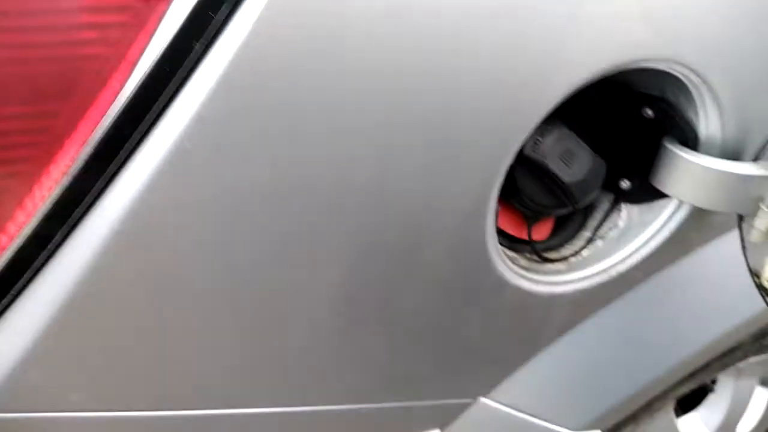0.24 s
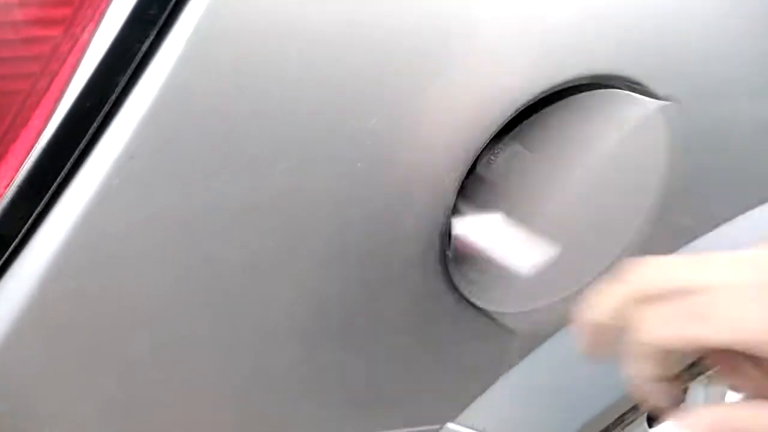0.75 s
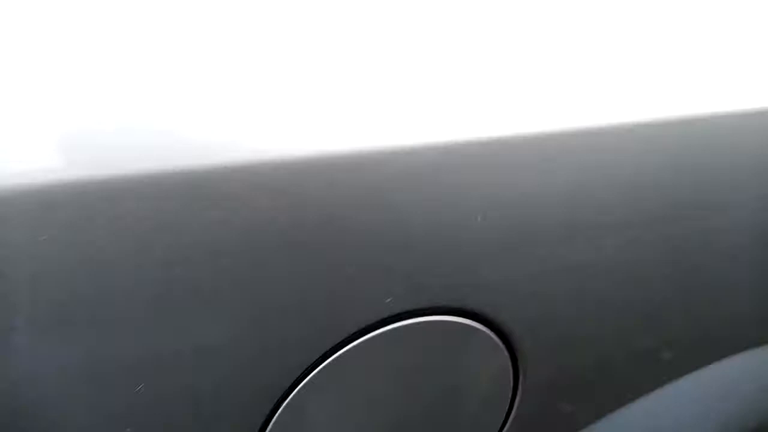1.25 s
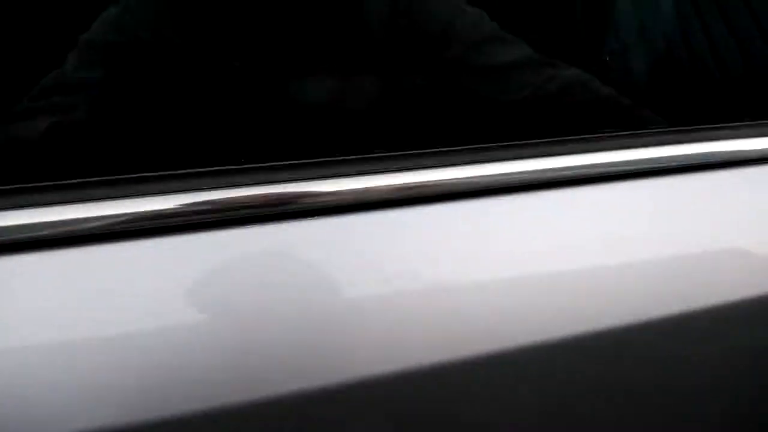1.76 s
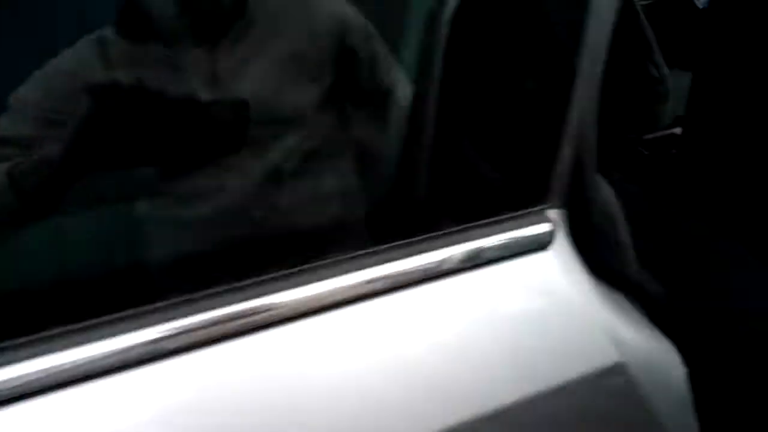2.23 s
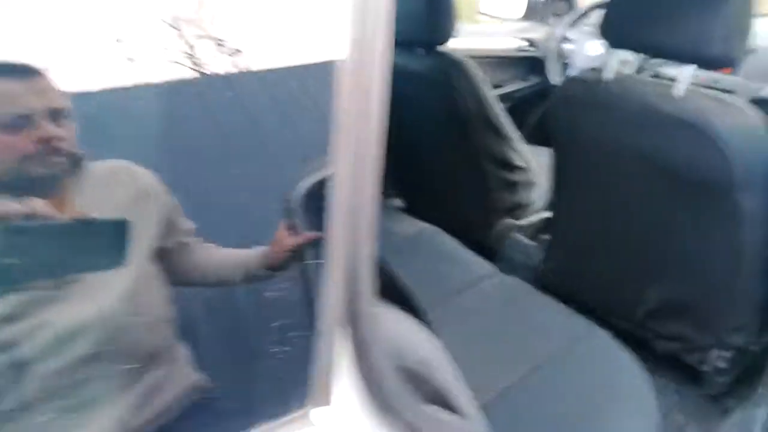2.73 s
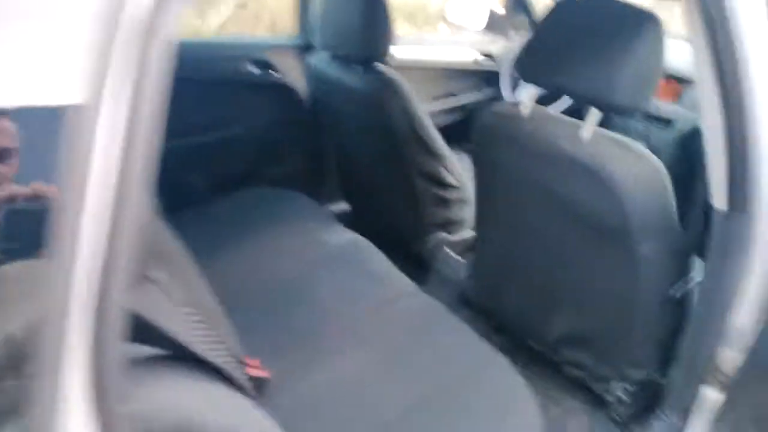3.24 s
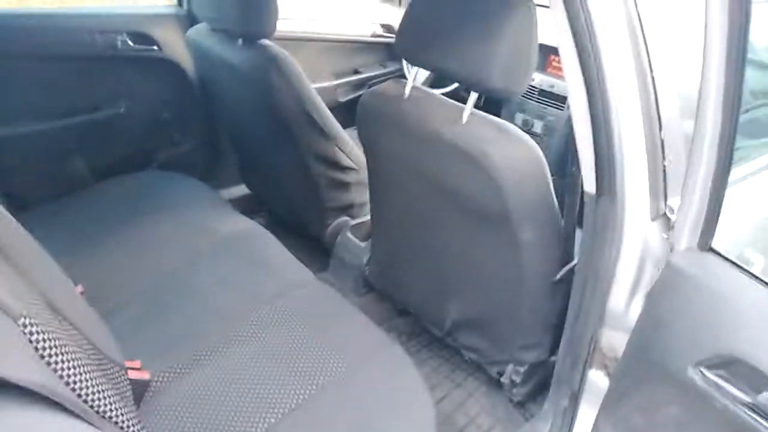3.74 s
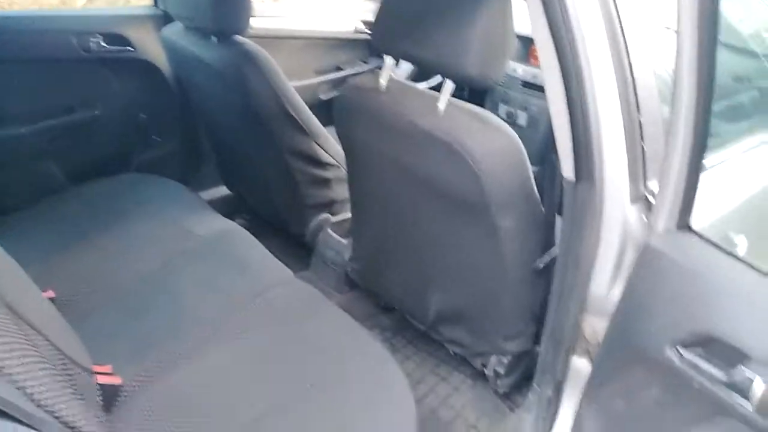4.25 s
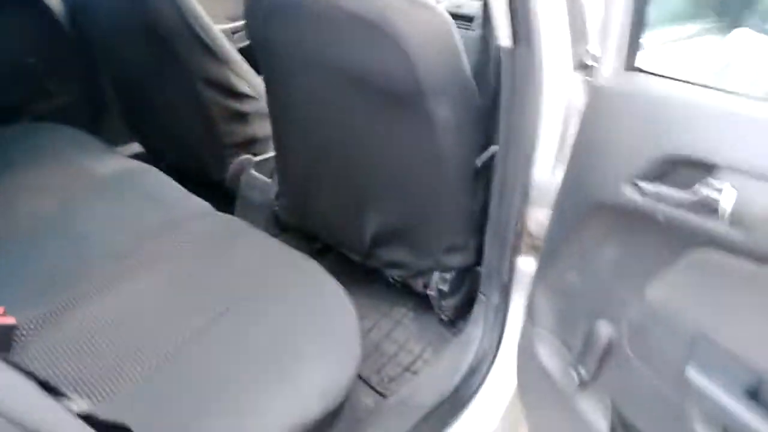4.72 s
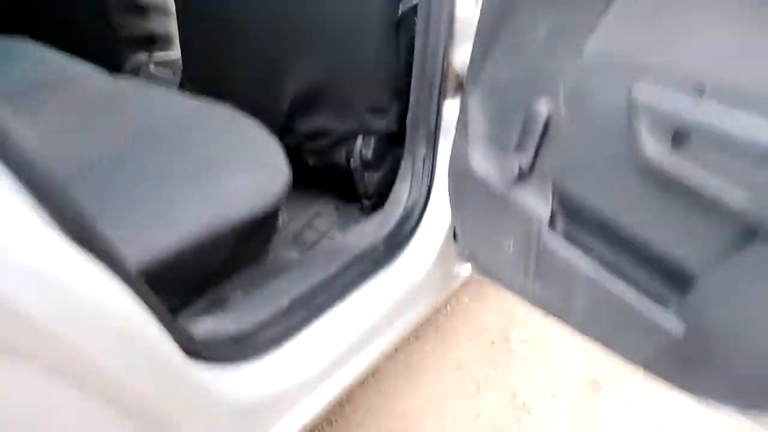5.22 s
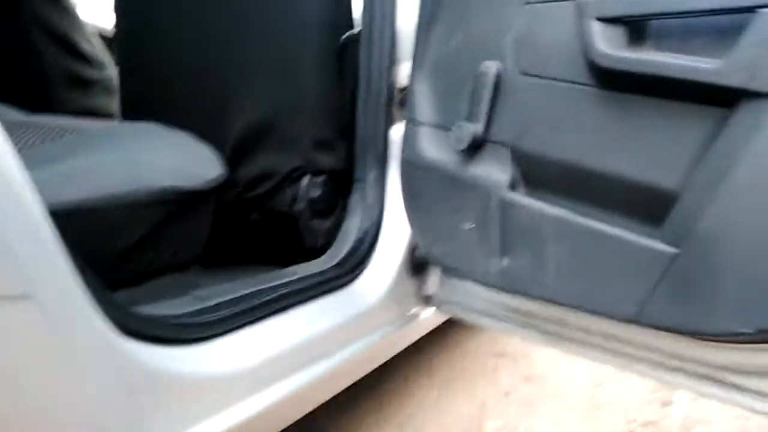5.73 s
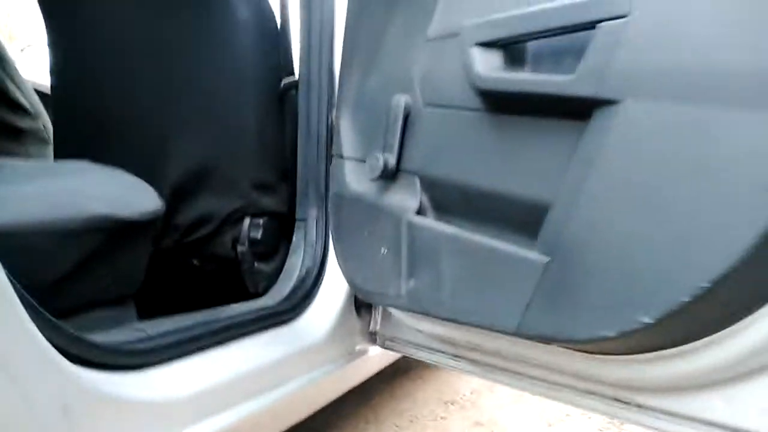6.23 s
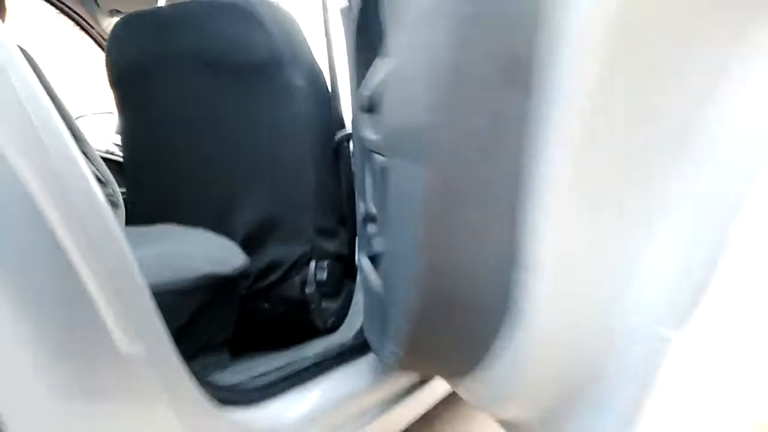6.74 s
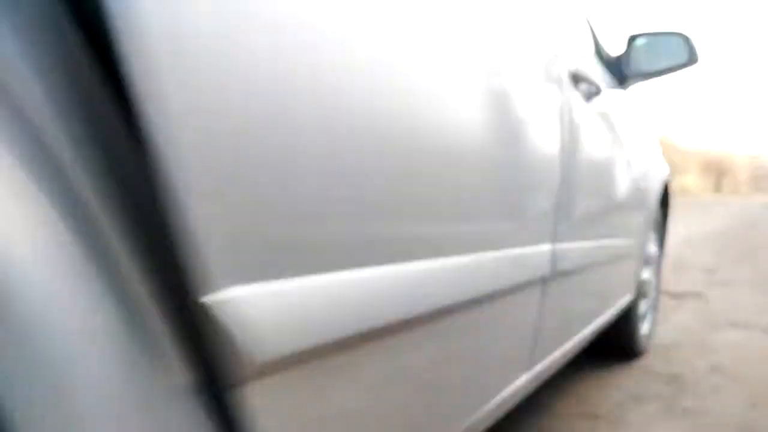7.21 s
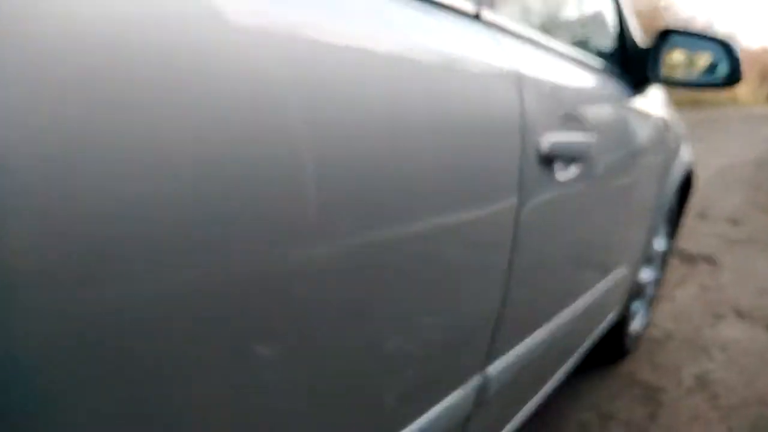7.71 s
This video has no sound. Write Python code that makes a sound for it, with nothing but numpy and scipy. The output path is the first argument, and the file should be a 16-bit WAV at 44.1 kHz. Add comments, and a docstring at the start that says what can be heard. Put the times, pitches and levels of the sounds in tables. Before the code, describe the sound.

Outdoors, a four-cylinder diesel idles steadily with low hum, boomy throb, knocking and ticking. Close to the microphone a fuel flap snaps shut, a door handle clunks, and the rear door unlatches with a loud crack, squeaks thinly and bumps past its check strap. Beside the open door the engine grows hollow, then louder and brighter. Near the end the door slams with a heavy double thud.

```python
"""A four-cylinder diesel car idles outdoors, heard by someone walking along its side.
The fuel flap snaps shut, a handle is pulled, the rear door unlatches, squeaks and swings past its
check strap; at the end it is slammed. The engine grows louder and brighter beside the open door.
The engine is shaped noise, ringing tones and steady hums locked to the crank; the door parts are
dying tones and noise, the latches short cracks of noise, and the squeaks gliding tones."""
import sys
import numpy as np
from scipy import signal
from scipy.fft import rfft, irfft, next_fast_len
from scipy.io import wavfile
from scipy.ndimage import map_coordinates

SR = 44100
rng = np.random.default_rng(int(sys.argv[2]) if len(sys.argv) > 2 else 0)


def dump(signal):
    """Clip the signal to [-1, 1] and save it as 16-bit WAV at the path in sys.argv[1]."""
    limited = np.clip(np.atleast_2d(signal).T, -1, 1)
    pcm = np.round(limited * 32767).astype(np.int16)
    wavfile.write(sys.argv[1], SR, pcm)


N = 351477
T = np.arange(N) / SR  # time of every sample in seconds

# One cycle of the engine is two turns of the crank.
# Every firing brings the same impacts: combustion, piston slap, valve.
# Each row: delay in seconds, decay in ms, then relative boom, knock and ticking levels in dB.
STROKES = [(0, 8.3, -2, 2.5, 11), (.0075, 7, 1, 0, 2), (0.0247, 16, 4.5, -16, 5)]
# The firings of the four cylinders, each ringing its own modes (natural tones) of the block.
# Each row: firing time as a share of the cycle, then a list of modes, each with
# starting pitch in Hz, relative level in dB, t60 (time to fall by 60 dB) in s, glide in Hz per s.
CYLINDERS = [(.95, [(1751, 2.5, 0.072, 3000), (1245, -7.5, 0.081, 0), (742.7, -3.5, 0.18, -1500)]),
             (.19, [(1833, -4, 0.11, 0), (1660, 0.5, 0.092, 0), (1253, -13.5, 0.079, 0),
             (946, 1.5, 0.094, 0), (770, -18, 0.061, 0)]), (.45, [(2054, -5.5, 0.075, 4000),
             (1652, 1.5, 0.053, 0), (1351, 2.5, 0.13, -13000), (1184, -0.5, 0.096, 0),
             (787, -11, 0.14, 0)]), (.715, [(1560, -8, 0.043, 0), (1175, -6.5, 0.09, -3000),
             (805, -1.5, 0.089, -7000), (709, -3.5, 0.068, 0)])]
# How alike left and right sound. Each row: frequency in Hz, likeness from 0 to 1.
LIKENESS = [(60, 0.53), (250, 0.77), (500, 0.41), (1000, 0.29), (2000, 0.18), (5000, 0.14), (12000, 0.16)]

USUAL_EXHAUST_DB = -43  # reference level of the exhaust
THROB_CREST = .278  # where the body's throb crests, as a share of the cycle


def amp(db):
    """Turns decibels into a plain multiplier."""
    return 10 ** (np.asarray(db) / 20)


def evened(x):
    """Scales to an rms of one."""
    return x / np.sqrt(np.mean(x ** 2) + 1e-20)


def read(points, hz):
    """Reads a spectrum on a log-frequency axis."""
    f, value = np.transpose(points)
    return np.interp(np.log(hz + 1), np.log(f + 1), value)


def add(mix, s, sound):
    """Adds a sound to the mix at time s."""
    part = mix[:, round(s * SR):][:, :sound.shape[1]]
    part += sound[:, :part.shape[1]]


def tint(x, colour):
    """Filters by a spectrum of (Hz, dB) points."""
    length = x.shape[-1]
    size = next_fast_len(length + 2000)
    gain = amp(read(colour, np.fft.rfftfreq(size, 1 / SR)))
    return irfft(rfft(x, size) * gain, size)[..., :length]


def pair():
    """Left and right noise: alike in the bass, less so in the treble."""
    size = next_fast_len(N)
    a, b = rfft(rng.standard_normal((2, size)))
    same = np.clip(read(LIKENESS, np.fft.rfftfreq(size, 1 / SR)), 0, 1)
    return irfft(np.array([a, same * a + np.sqrt(1 - same ** 2) * b]), size)[:, :N]


def drift(per_s):
    """Slow random wander of unit size, with per_s new random targets each second."""
    knots = np.arange(0, 9, 1 / per_s)
    return np.interp(T, knots, rng.standard_normal(len(knots)))


def between(start_s, end_s, rise_s, fall_s):
    """Rises from 0 to 1 after the start and is back at 0 by the end."""
    return np.clip(np.minimum((T - start_s) / rise_s, (end_s - T) / fall_s), 0, 1)


def clatter(cycle, strokes_db, cylinders_db, colour, repeat, wash_db, scatter_db, jitter_ms, rise_s=0.0027):
    """Every impact frees a dying burst of vibration; part of it repeats from cycle to cycle."""
    power = np.zeros((1, N))
    t = np.arange(2000) / SR
    for (delay_s, decay_ms, *_), stroke_db in zip(STROKES, strokes_db):
        burst = (1 - np.exp(-t / rise_s)) * np.exp(-10 ** 3 * t / decay_ms)
        burst_power = burst[None] ** 2
        for (share, _), cylinder_db in zip(CYLINDERS, cylinders_db):
            times = np.interp(np.arange(share, cycle[-1]), cycle, T) + delay_s
            for s, (size, slip) in zip(times, rng.standard_normal((len(times), 2))):
                gain = amp(stroke_db + cylinder_db + scatter_db * size)
                add(power, abs(s + slip * jitter_ms / 10 ** 3), gain ** 2 * burst_power)
    # a steady wash lies under the bursts
    force = np.sqrt(power[0] / power.mean() + amp(wash_db) ** 2)
    # the same parts collide in every cycle: one random pattern, one cycle long, for each side
    period = round(N / cycle[-1])
    phase, stray = 2 * np.pi * rng.random((2, period // 2))
    unlike = 1 - np.clip(read(LIKENESS, np.linspace(0, SR / 2, period // 2)), 0, 1)
    right_phase = phase + unlike * (stray - np.pi)
    patterns = evened(irfft(np.exp(1j * np.array([phase, right_phase]))))
    habit = np.array([np.interp((cycle % 1) * len(p), np.arange(len(p)), p) for p in patterns])
    repeat = np.clip(repeat, 0, 1)  # share of the power that repeats
    texture = np.sqrt(repeat) * habit + np.sqrt(1 - repeat) * pair()
    sound = tint(force * texture, colour)
    return sound / np.std(sound.mean(0))


def exhaust(cycle, level_db, waver_db=1.0):
    """Low, clean hums in step with the crank; the lines follow the exhaust level by different amounts."""
    # Each row: multiple of the crank speed, relative level in dB, dB gained per dB of exhaust level.
    lines = [(4, 0.5, 1), (6, -.5, 1.5), (8, -15, 1), (10, -12.5, 0.75), (12, -11.5, 0.5)]
    hum = 0
    for k, db, reach in lines:
        line_db = USUAL_EXHAUST_DB + db + reach * (level_db - USUAL_EXHAUST_DB)
        level = amp(line_db + waver_db * drift(4.0)) * np.sqrt(2)
        hum = hum + level * np.sin(2 * np.pi * (2 * round(k) * cycle + rng.random()))
    return hum


def drone(cycle, waver_db=1):
    """The crank shakes the body shell; its lines swell together once in each turn."""
    # Each row: multiple of the crank speed, relative level in dB.
    lines = [(16, -3.5), (17, -2.5), (18, 0), (19, -9.5), (20, -8), (24, -3.5), (26, -6.5), (29, -10),
             (31.5, -8)]
    return evened(sum(amp(db + waver_db * drift(7))
                      * np.cos(2 * np.pi * round(2 * k) * (cycle - THROB_CREST)) for k, db in lines))


def firings(cycle, scatter_db=1.6, jitter_ms=0.098, detune=0.011, rise_s=0.0019, spread=1.17, roam_db=1.5):
    """Each cylinder fires once a cycle and rings the block; some rings glide, as bending waves spread."""
    # How hard each cylinder rings the block, in firing-table order: relative level in dB.
    cylinder_levels = [0.59, 0, -1.2, 0.84]
    out, t = np.zeros((2, N)), np.arange(SR // 12) / SR
    side = np.array([.5, -.5])[:, None, None]
    for (share, modes), cylinder_db in zip(CYLINDERS, cylinder_levels):
        hz, db, t60, glide = np.transpose(modes)[:, :, None]
        # every mode reaches the two sides with its own phase, and waxes and wanes as the listener moves
        phase = 2 * np.pi * rng.random(hz.shape) + spread * side * rng.choice([-1, 1], hz.shape)
        roam = roam_db * np.array([drift(1) for _ in modes])
        fade = amp(cylinder_db + db - 60 * t / t60) * (1 - np.exp(-t / rise_s))
        for s in np.interp(np.arange(share, cycle[-1]), cycle, T):
            size, bend = rng.standard_normal((2, *hz.shape))
            level = amp(scatter_db * size + roam[:, int(s * SR), None]) * fade
            turns = (hz * (1 + detune * bend) + glide * t / 2) * t
            ring = level * np.sin(2 * np.pi * turns + phase)
            add(out, s + jitter_ms / 10 ** 3 * rng.standard_normal(), ring.sum(1))
    return out / np.std(out.mean(0))


def cabin(knock, delay_s=0.004028):
    """The knock sets the hollow resonances of the cabin humming; they arrive a little later."""
    # Each row: frequency in Hz, width in Hz, relative level in dB.
    resonances = [(584, 15, -2.5), (708, 50, -4), (858, 18, 2), (1088, 12, 3.5), (1346, 22, -2),
                  (1770, 130, -5.5)]
    sound = sum(amp(db) * signal.lfilter(*signal.iirpeak(hz, hz / width, fs=SR), knock)
                for hz, width, db in resonances)
    return np.roll(sound, round(delay_s * SR), axis=1) / np.std(sound.mean(0))


def engine():
    """Exhaust hum, body boom, combustion knock and injector ticking, all locked to the crank."""
    # Engine along the walk. Each row: time in seconds, knock and ticking reference levels in dB.
    walk = [(0.0, -38.5, -43), (0.53, -40, -44.5), (1.82, -39, -40.5), (2.42, -42, -44.5),
            (2.75, -42, -43.5), (4.42, -41.5, -43.5), (4.95, -38, -40), (5.81, -34.5, -36.5),
            (7.26, -34, -38), (7.97, -37, -38.5)]
    # Exhaust: steady at the rear, screened by the body mid-walk, back beside the sill.
    # Each row: time in seconds, reference level in dB.
    tailpipe = [(1.7, -43), (2.65, -48), (2.97, -52.5), (4.26, -54), (5.12, -51), (5.27, -47.5), (5.5, -44),
                (7.2, -41)]
    # The cylinders hit unequally. Each row: relative boom, knock and ticking levels in dB.
    uneven = [(1, 0.5, -1), (2, 1, 2.5), (-14, 2, .5), (0, 0.5, 1)]
    # Colour of the boom. Each row: frequency in Hz, relative level in dB.
    boom_colour = [(20, -46), (100, -42), (140, -25), (200, -3), (240, 0.5), (265, 0), (295, -4),
                   (345, -2.5), (440, -9.5), (520, -14.5), (800, -43)]
    # Colour of the knock. Each row: frequency in Hz, relative level in dB.
    knock_colour = [(300, -14.5), (480, -7), (600, 1), (720, 2.5), (850, -1), (950, -4), (1030, -3),
                    (1240, -0.5), (1480, -3), (1780, -4.5), (2100, -8.5), (2700, -13.5), (4000, -18.5),
                    (8000, -52)]
    # Colour of the ticking. Each row: frequency in Hz, relative level in dB.
    tick_colour = [(1290, -29), (2200, -4), (2720, -8), (3340, -7), (3940, -13), (4370, -5), (4960, -5.5),
                   (8020, 2), (10500, -17), (13700, -26), (14500, -29)]
    # Bearing of the engine. Each row: time in seconds, ms by which the left side lags.
    bearing = [(1.2, -0.33), (1.7, -0.44), (5.2, -0.456), (5.7, 0.013)]
    # Balance of the two sides. Each row: frequency in Hz, left minus right in dB.
    balance = [(60, 0.2), (140, 7.5), (250, 2.5), (500, 3), (760, 3.5), (1170, -1), (1780, 4), (2700, 2),
               (4200, 2), (6400, -1), (7600, 7.5), (9000, 10), (10800, 12), (13000, 12)]
    idle_rpm, start_phase = 834.65, -.0225  # crank turns per minute; first position in cycles
    # the boom follows the knock and the exhaust only a little (dB per dB away from their usual levels)
    usual_boom_db, per_knock, per_exhaust, usual_knock_db = -39.5, 0.029, 0.19, -39
    # layers in dB against the level that each follows
    drone_db, knock_layer_db, ring_db, cabin_db, tick_layer_db, hum_db = 2, 0, -1.4, -3, 0.56, -1.24
    # amplitude share (0-1) of the block's ring that comes straight through the air
    direct_outside, direct_inside = 0.95, 0.51
    throb_db = 1.5  # swing of the boom, up and down

    cycle = start_phase + T * idle_rpm / 120
    s, *levels = np.transpose(walk)
    knock_db, tick_db = (np.interp(T, s, level) for level in levels)
    exhaust_db = np.interp(T, *np.transpose(tailpipe))
    boom_db = usual_boom_db + per_knock * (knock_db - usual_knock_db)
    boom_db = boom_db + per_exhaust * (exhaust_db - USUAL_EXHAUST_DB)
    # the listener faces in through the open door for a while
    inside = between(2.65, 5.45, rise_s=.35, fall_s=1.3)
    direct = np.clip(direct_outside + (direct_inside - direct_outside) * inside, 0, 1)
    booms, knocks, ticks = zip(np.transpose(STROKES)[2:], np.transpose(uneven))

    # the body throbs once in each turn of the crank
    throb = amp(throb_db * np.cos(4 * np.pi * (cycle - THROB_CREST)))
    boom = clatter(cycle, *booms, boom_colour, repeat=0.58, wash_db=-3, scatter_db=2, jitter_ms=0.18)
    boom = amp(boom_db) * throb * boom
    sound = boom + footwell(boom)
    sound += amp(boom_db + drone_db) * drone(cycle)
    sound += exhaust(cycle, exhaust_db + hum_db)
    knock = clatter(cycle, *knocks, knock_colour, repeat=0.65, wash_db=-1.5, scatter_db=0.9, jitter_ms=0.33)
    sound += amp(knock_db + knock_layer_db) * knock
    sound += amp(knock_db + ring_db) * direct * firings(cycle)
    sound += amp(knock_db + cabin_db) * np.sqrt(1 - direct ** 2) * cabin(knock)
    tick = clatter(cycle, *ticks, tick_colour, repeat=0.15, wash_db=0.5, scatter_db=1.3, jitter_ms=0.67)
    sound += amp(tick_db + tick_layer_db) * tick
    # the two sides differ in arrival time and in colour
    lag = np.interp(T, *np.transpose(bearing)) * SR / 10 ** 3
    left = map_coordinates(sound[0], [np.arange(N) - lag], order=3, mode="nearest")
    left = tint(left, [(hz, db / 2) for hz, db in balance])
    right = tint(sound[1], [(hz, -db / 2) for hz, db in balance])
    return np.array([left, right])


def clicks(rise_s=0.0002):
    """Small hard catches and latches snap with a quickly dying crack of coloured noise."""
    # Each row: time in seconds, level in dB, t60 in seconds,
    # treble tilt in dB per octave above 1500 Hz, left minus right in dB.
    snaps = [(0.7922, -14.5, 0.053, 10.5, 1), (0.8002, -19.5, 0.043, -5, 0), (1.8466, -20, 0.041, 4, 5.5),
             (1.904, -35, 0.044, 4, 6), (1.957, -31.5, .09, 14, 6), (2.039, -26.5, 0.037, 8, 6),
             (2.281, -30, .12, 1, 12), (2.2907, -12, 0.06, 4.5, 8), (2.294, -7, 0.062, -16.5, -3),
             (2.300, -15.5, 0.081, -3, -1), (2.9675, -20.5, 0.053, -6.5, 1), (7.287, -14, 0.1, 4.5, -3),
             (7.3013, -6.5, 0.062, 6, -1.5), (7.326, -19.5, 0.067, -12, -3)]
    # Colour of a latch before its tilt. Each row: frequency in Hz, relative level in dB.
    latch = [(200, -40), (600, -6), (1800, 1.5), (3000, -4.5), (4200, -7), (6000, -5.5), (7800, -2),
             (10000, -14), (14000, -29.5)]
    out, t = np.zeros((2, N)), np.arange(SR // 5) / SR
    for s, db, t60, tilt_db, pan_db in snaps:
        a, b = rng.standard_normal((2, len(t)))
        colour = [(hz, level + tilt_db * np.log2(max(hz, 1500))) for hz, level in latch]
        crack = evened(tint(np.array([a + 0.92 * b, a - 0.58 * b]), colour))
        fade = amp(db - 60 * t / t60) * (1 - np.exp(-t / rise_s))
        add(out, s, crack * fade * amp([[pan_db / 2], [-pan_db / 2]]))
    return out


def blows(rise_cycles=0.31, ring_rise_s=0.0014, skirt_db=10, low_cut=0.89):
    """A struck part rings in its own modes, low ones building more slowly, over a dense panel ring."""
    # Modes of the fuel flap. Each row, here and in the next five: pitch in Hz, relative level in dB, t60 in s.
    FLAP = [(224.4, -4, .11), (275, 1, 0.045), (407, -10, 0.068), (513, 2.5, 0.02), (690, -18.5, 0.092),
            (880, -28, 0.061), (1320, -18, 0.043)]
    # Modes of the door handle (Hz, dB, s).
    HANDLE = [(81.6, -19, 0.29), (136, -1.5, 0.056), (164.8, -11.5, 0.29), (202, -5.5, 0.14),
              (256, -5.5, 0.089), (329, -25, .4), (435, -13, 0.064), (510, -11, 0.046), (610, -17.5, 0.093),
              (806, -24, 0.1)]
    # Modes of the unlatching door (Hz, dB, s).
    DOOR = [(156, -16, 0.54), (194, -3, 0.091), (237.3, -10.5, 0.22), (271, -13, 0.27), (396, -26, 0.28),
            (507, -11.5, 0.1), (577, -22, .25), (618, -19.5, 0.18), (773, -20, 0.14), (1200, -28, 0.13)]
    # Modes of the check strap (Hz, dB, s).
    STRAP = [(274.7, -14, 0.36), (367, 3, 0.052), (468, -6, 0.071), (586, -5, 0.073), (780, -8, 0.047),
             (950, -6, 0.03), (1760, -24, .07)]
    # Modes of the striker that catches the slammed door (Hz, dB, s).
    STRIKER = [(208.3, -3, 0.11), (307, 1.5, 0.039), (390, 2.5, 0.061), (598, -2.5, 0.096),
               (776, -12, 0.055), (940, -8, 0.066)]
    # Modes of the body shell (Hz, dB, s).
    SHELL = [(61.5, -16, 0.76), (78.3, -17.5, 0.78), (127.6, -18, 0.44), (169, -18, .28),
             (226, -5.5, 0.095), (261, -11, 0.16), (303, 1.5, 0.035), (390, -13, 0.19), (510, -17, 0.074),
             (714, -21, 0.099)]
    # Each named part: its modes, ms by which the right side lags,
    # dB of the panel ring against the blow, its centre in Hz, its t60 in seconds.
    parts = {"flap": (FLAP, .18, -24, 347, .19), "handle": (HANDLE, 0.23, -17.5, 170, 0.34),
             "door": (DOOR, .36, -17, 175, .5), "strap": (STRAP, .28, -11.5, 440, 0.17),
             "striker": (STRIKER, -0.34, -7.5, 630, 0.14), "shell": (SHELL, -0.27, -20.5, 180, 0.63)}
    # Each row: time in seconds, name of the struck part, level in dB.
    hits = [(0.8056, "flap", 1), (.826, "flap", -27), (1.8448, "handle", 3), (1.903, "handle", -14),
            (2.039, "handle", -24), (2.302, "door", 1), (2.9699, "strap", -6.5), (7.2677, "striker", -9.5),
            (7.2904, "striker", -5.5), (7.3249, "shell", 2)]
    out, t = np.zeros((2, N)), np.arange(SR * 3 // 4) / SR
    for s, name, db in hits:
        part, lag_ms, ring_db, ring_hz, ring_t60 = parts[name]
        modes = sum(amp(db + level - 60 * t / t60) * (1 - np.exp(-t * hz / rise_cycles))
                    * np.sin(2 * np.pi * hz * t) for hz, level, t60 in part)
        # the panel ring is noise, strongest at its centre
        hump = [(ring_hz * 2. ** octave, -skirt_db * abs(octave) ** 1.03) for octave in range(-4, 6)]
        a, b = evened(tint(rng.standard_normal((2, len(t))), hump))
        fade = amp(db + ring_db - 60 * t / ring_t60) * (1 - np.exp(-t / ring_rise_s))
        ring = (a + 0.38 * b * np.array([[1], [-1]])) * fade
        # a panel radiates little below its lowest mode
        high_pass = signal.butter(2, part[0][0] * low_cut, "high", fs=SR, output="sos")
        sound = signal.sosfilt(high_pass, modes + ring)
        lag = lag_ms / 10 ** 3
        delayed = [np.interp(t - max(d, 0), t, side) for d, side in zip((-lag, lag), sound)]
        add(out, s, np.array(delayed))
    return out * amp([[.8], [-.8]])  # slightly to the left


def squeak(bend=.13, crest=1.5, waver=0.03, flutter_db=1.5):
    """Thin, uneven stick-slip tones as the door starts to swing; the pitch climbs, then drops."""
    # Each row: start in seconds, length in seconds, top pitch in Hz before its waver, level in dB.
    squeaks = [(2.498, .095, 1365, -37), (2.615, .055, 1290, -42)]
    out = np.zeros(N)
    for s, length, top_hz, db in squeaks:
        along = np.clip((T - s) / length, 0, 1)
        hz = top_hz * (1 - bend * (1 - np.sin(np.pi * along ** crest)))
        turns = np.cumsum(hz * (1 + waver * drift(300))) / SR
        swell = np.sqrt(abs(np.sin(np.pi * along)))
        out += swell * amp(db + flutter_db * drift(150)) * np.sin(2 * np.pi * turns)
    return out


def footwell(boom):
    """The footwell deepens the boom by a low hollow resonance, as the listener sinks toward the sill."""
    centre_hz, width_hz, gain_db = 152, 38, 12  # the width is that of each of two equal filters
    hollow = signal.iirpeak(centre_hz, centre_hz / width_hz, fs=SR)
    hum = signal.lfilter(*hollow, signal.lfilter(*hollow, boom))
    return amp(gain_db) * between(4.1, 6.1, rise_s=.5, fall_s=1.1) * hum


def scene():
    """The idling engine with the flap and door close by."""
    return engine() + clicks() + blows() + squeak()


def record(dry):
    """Clips any peaks beyond full scale, as in an overload, then cuts the highest treble."""
    edge_hz = 14500
    low_pass = signal.firwin(401, edge_hz, window=("kaiser", 8), fs=SR)
    return signal.oaconvolve(np.clip(dry, -1, 1), low_pass[None], "same")


dry = scene()
out = record(dry)
dump(out)
```